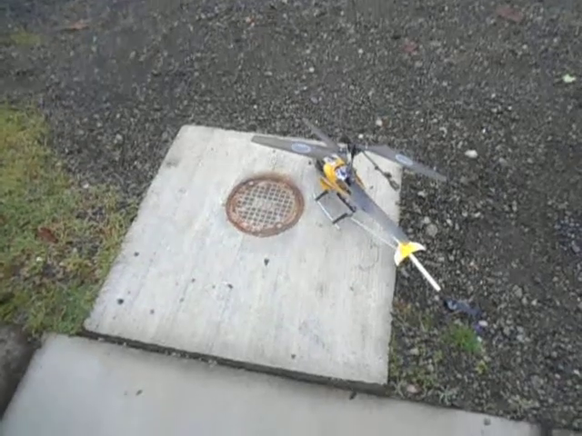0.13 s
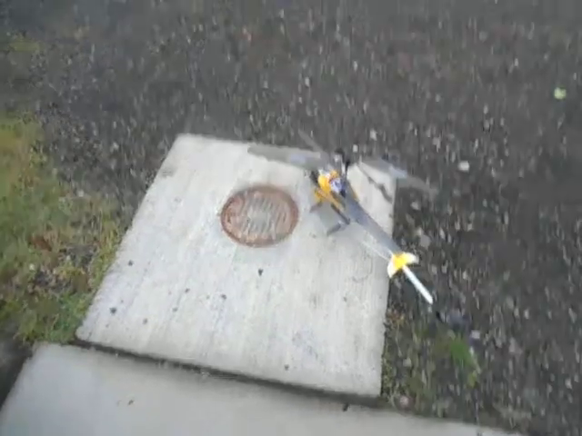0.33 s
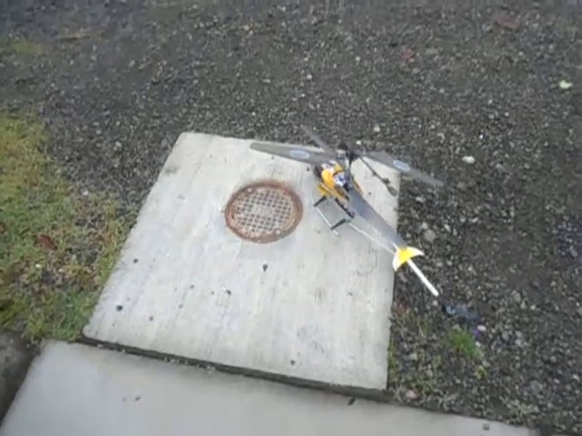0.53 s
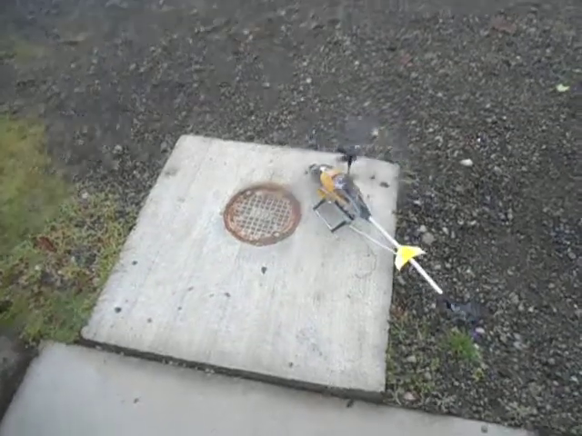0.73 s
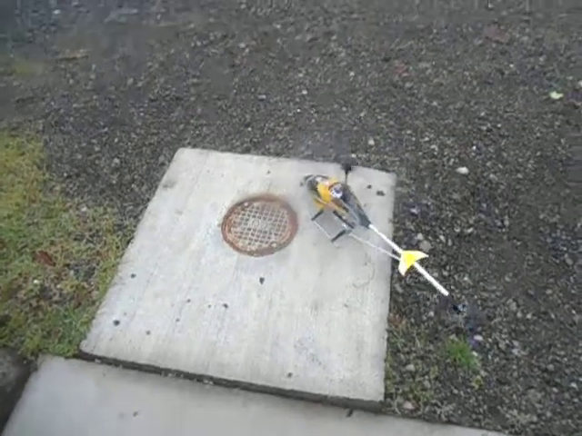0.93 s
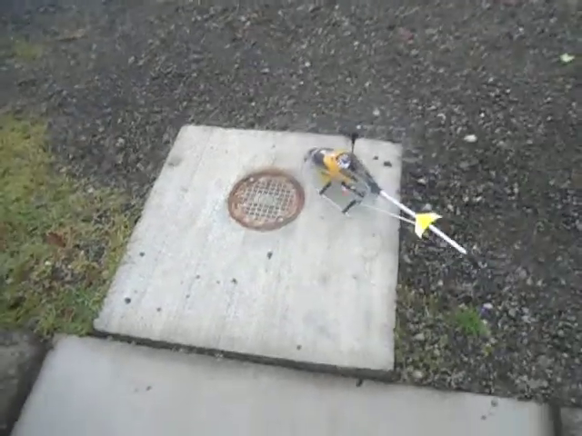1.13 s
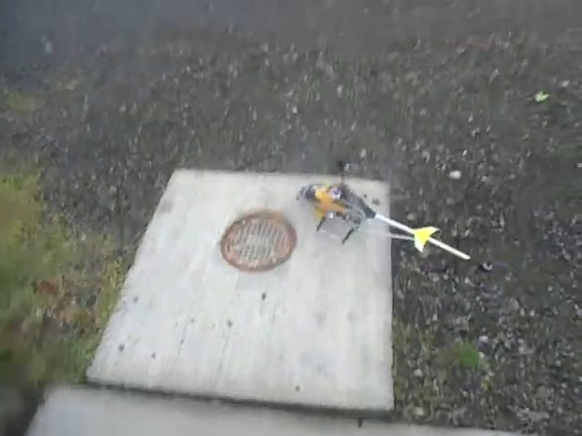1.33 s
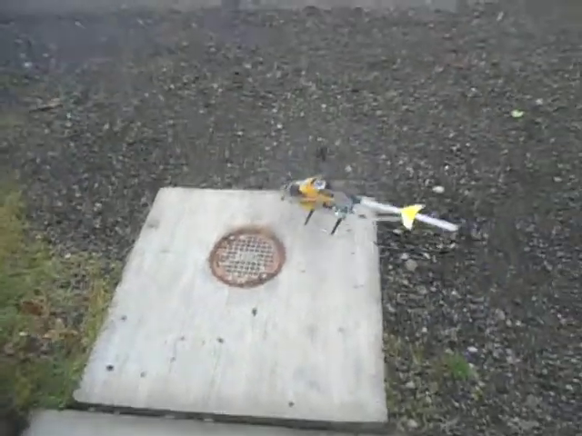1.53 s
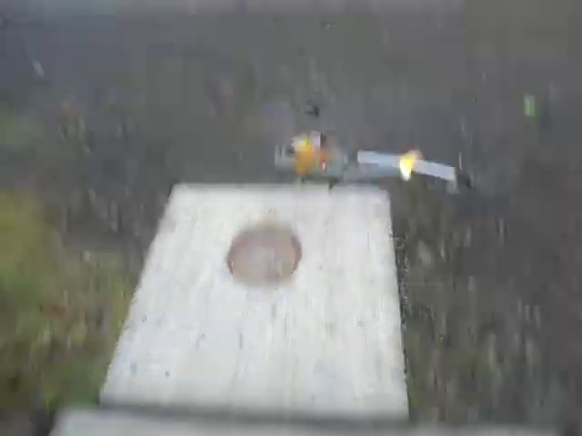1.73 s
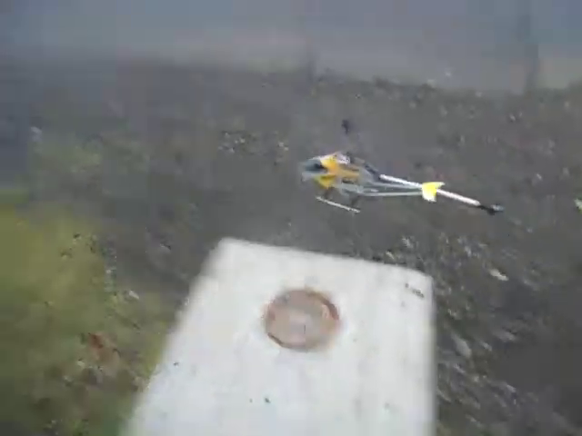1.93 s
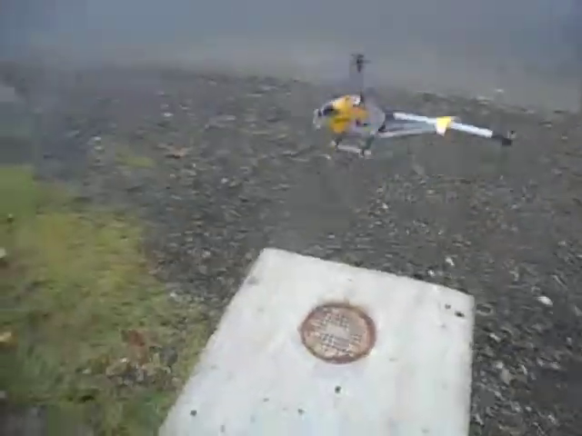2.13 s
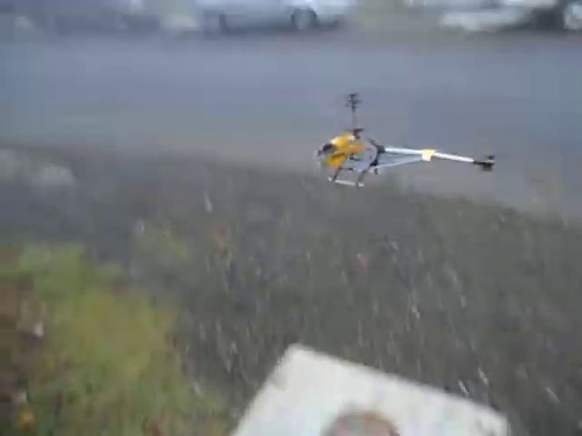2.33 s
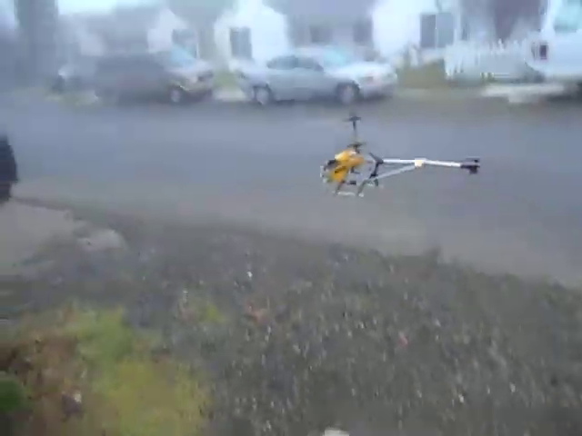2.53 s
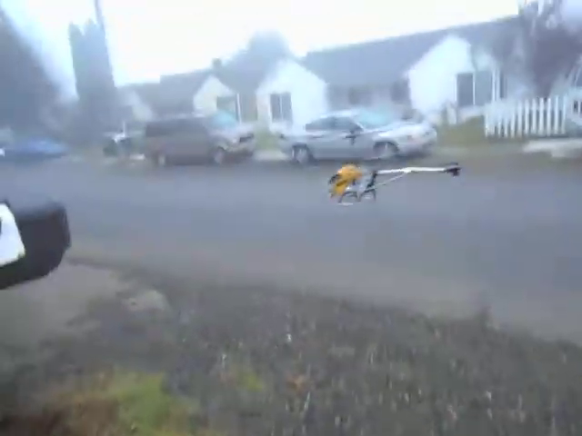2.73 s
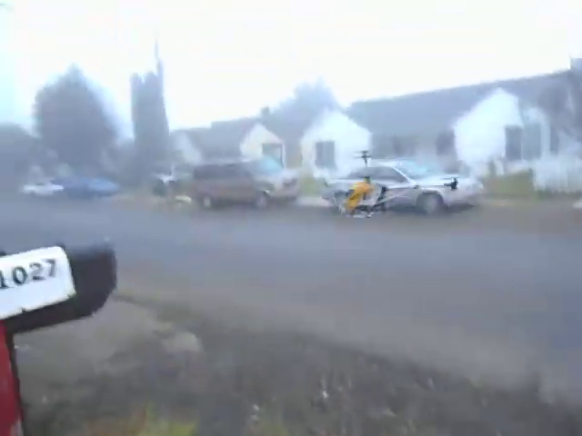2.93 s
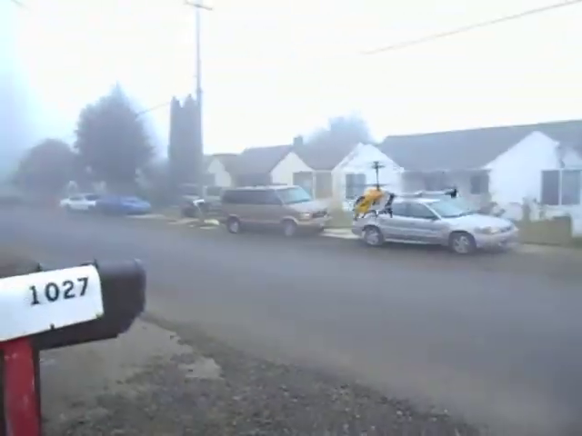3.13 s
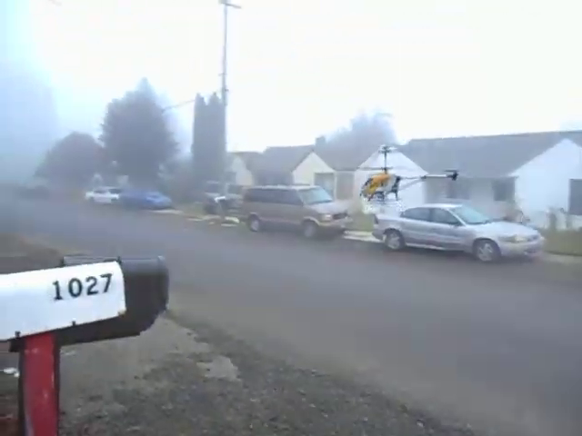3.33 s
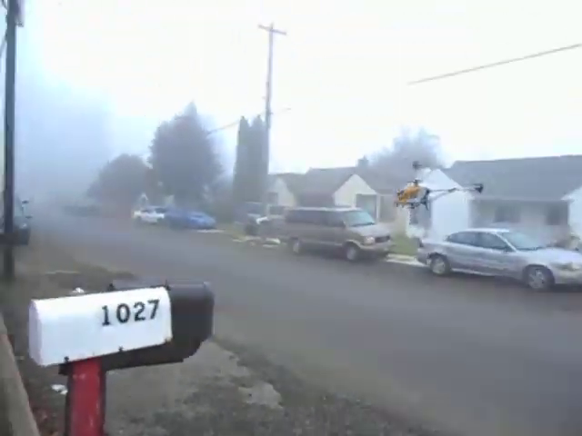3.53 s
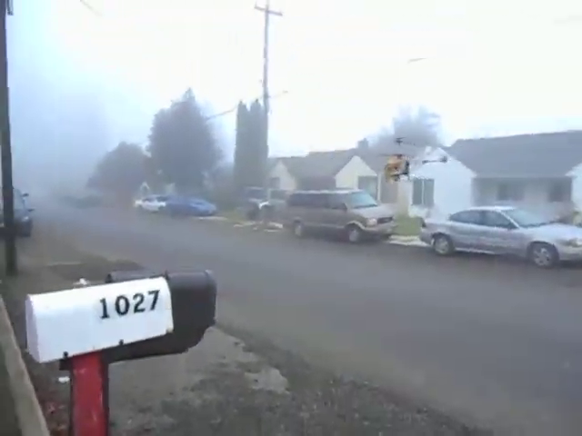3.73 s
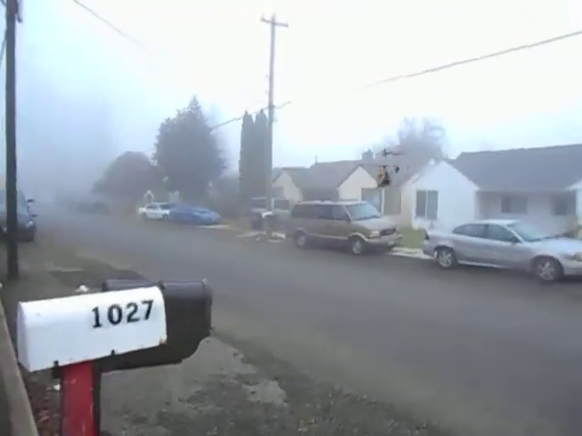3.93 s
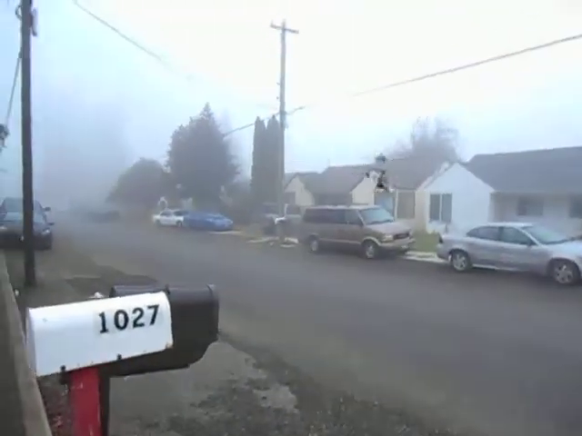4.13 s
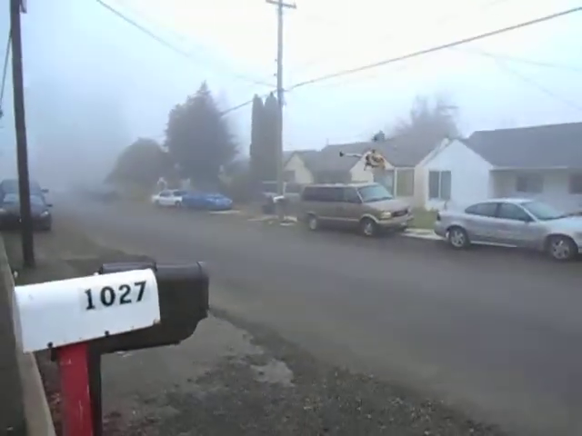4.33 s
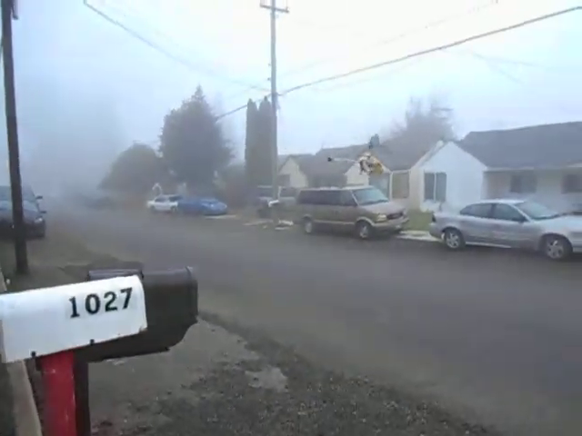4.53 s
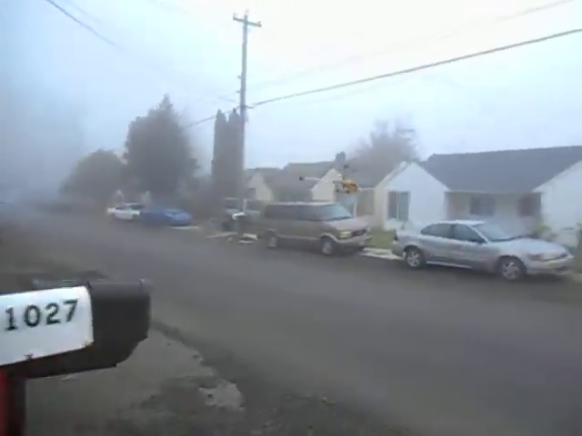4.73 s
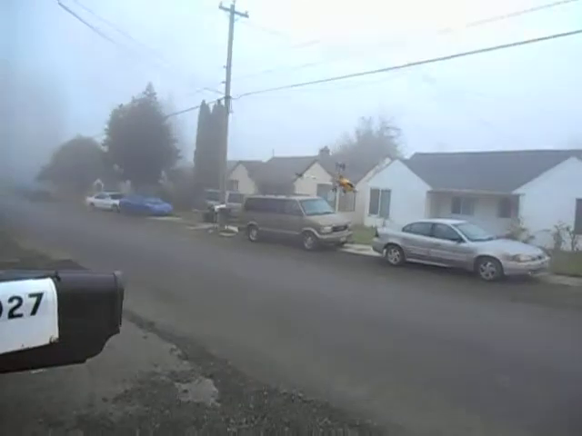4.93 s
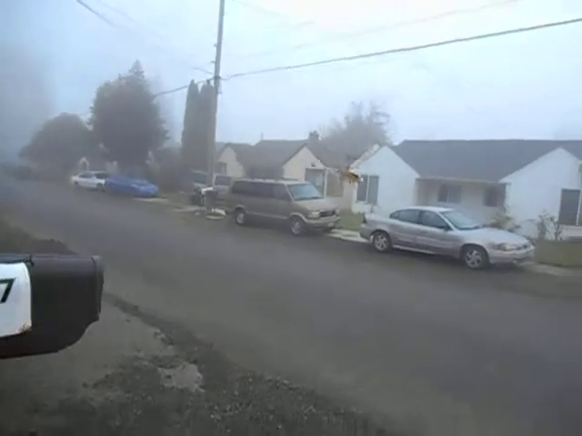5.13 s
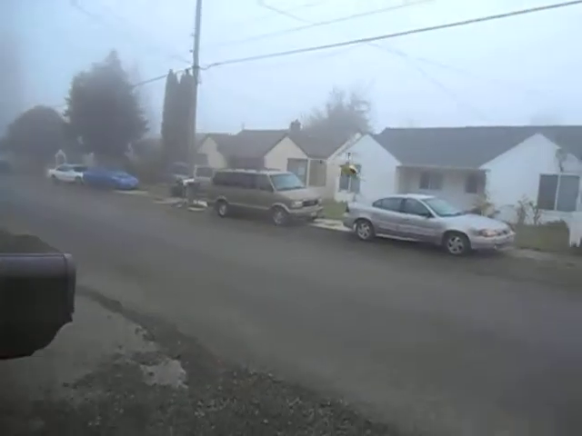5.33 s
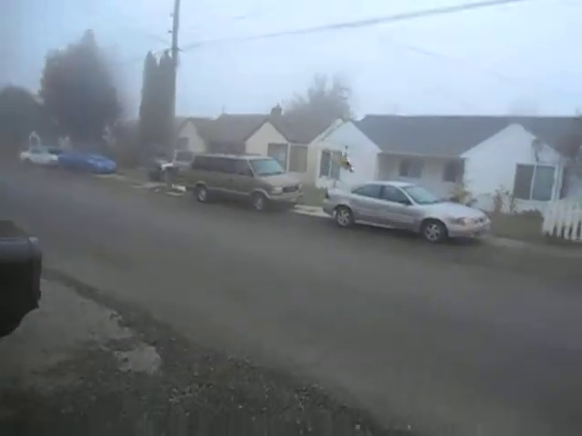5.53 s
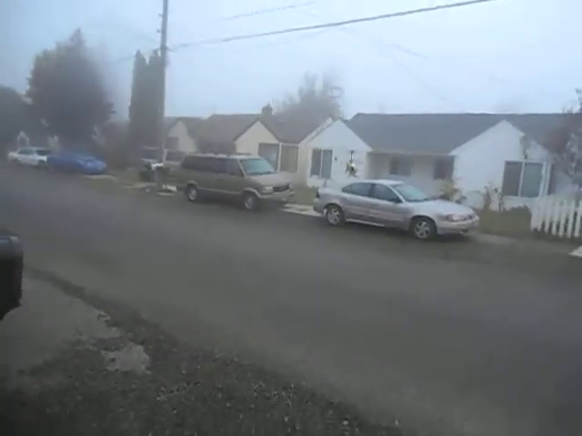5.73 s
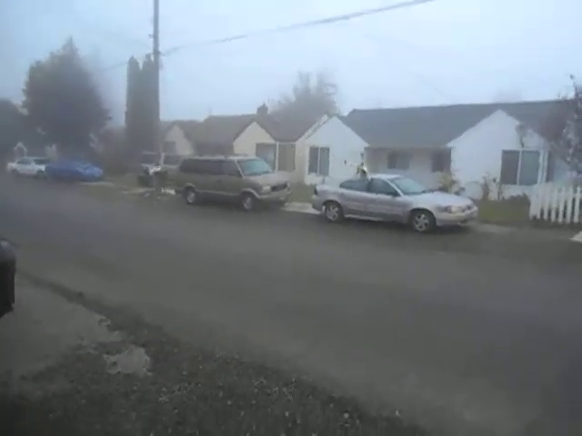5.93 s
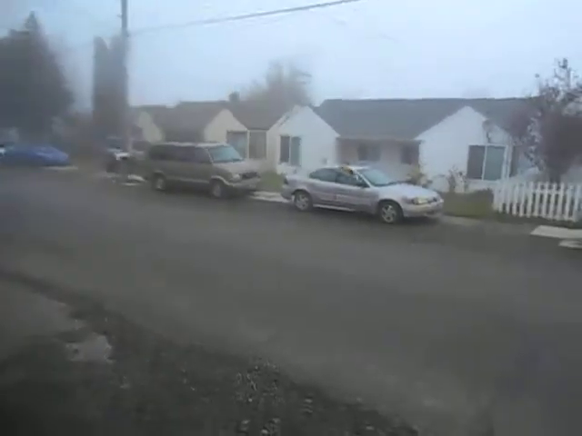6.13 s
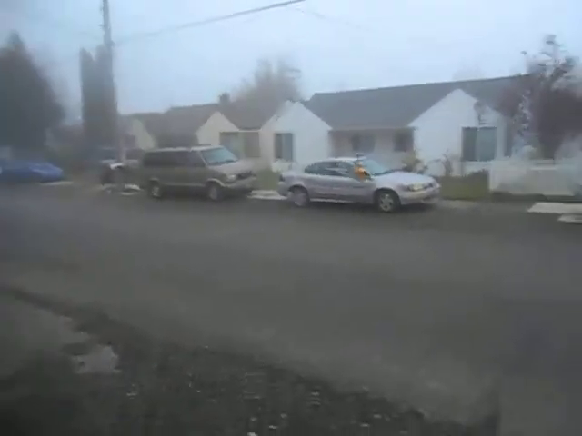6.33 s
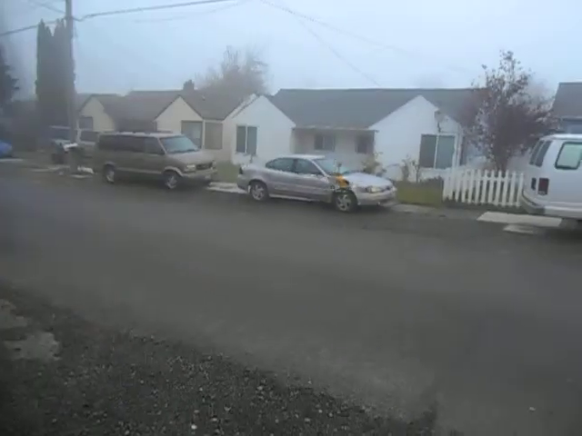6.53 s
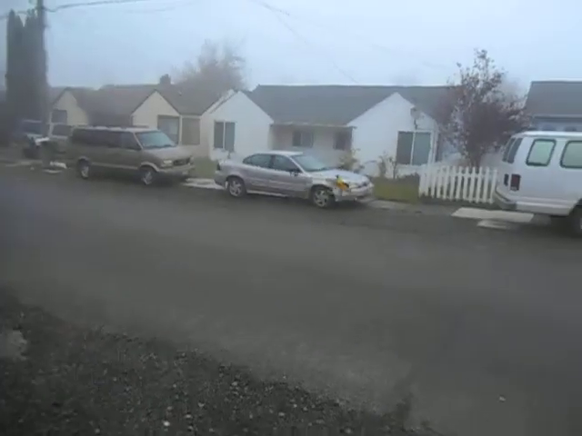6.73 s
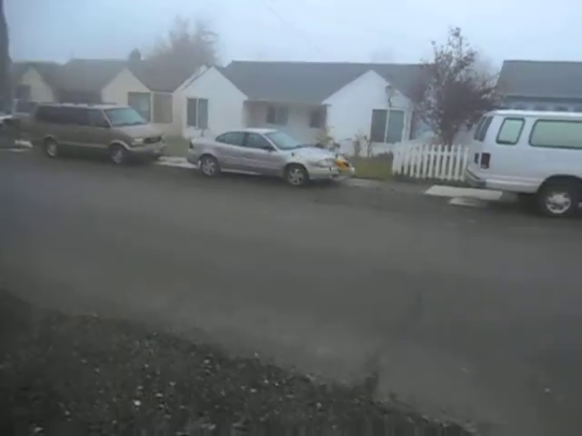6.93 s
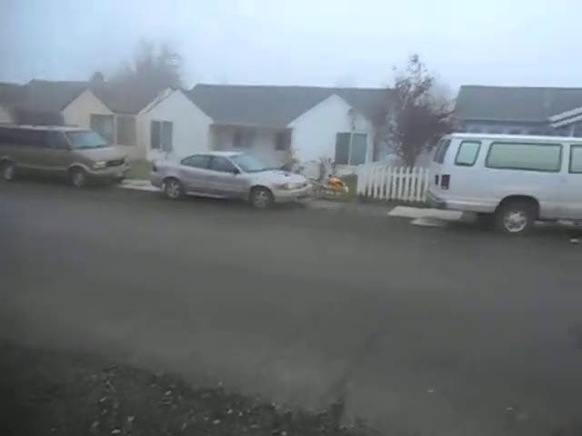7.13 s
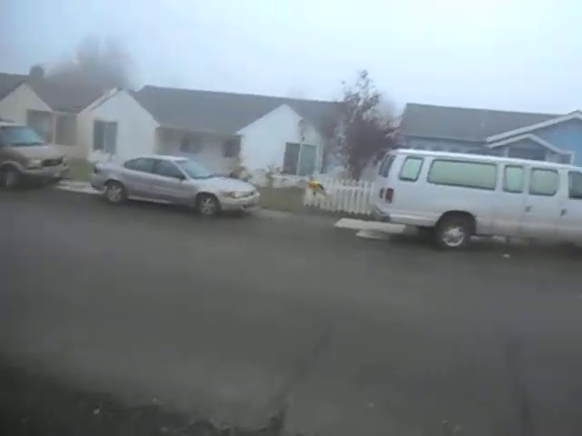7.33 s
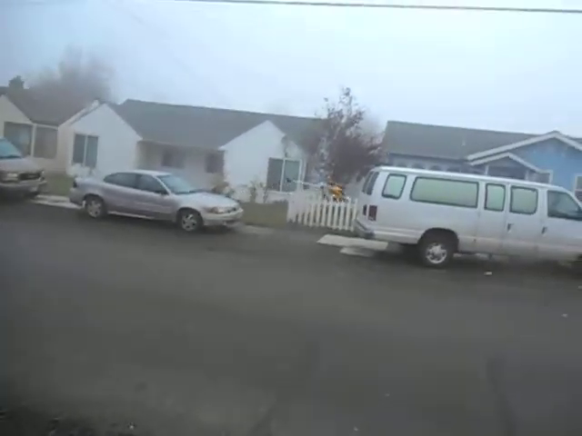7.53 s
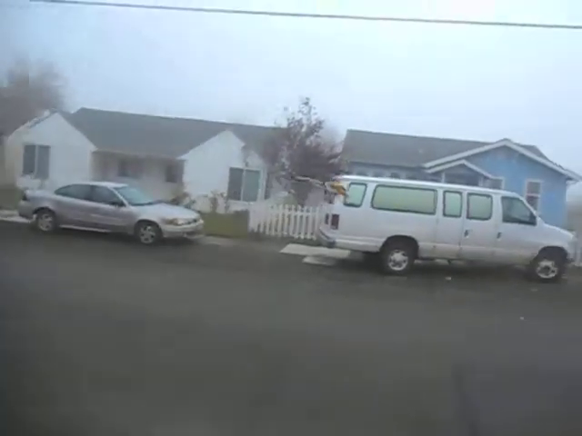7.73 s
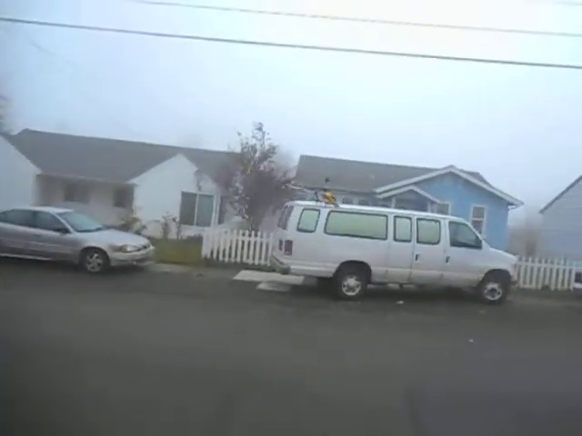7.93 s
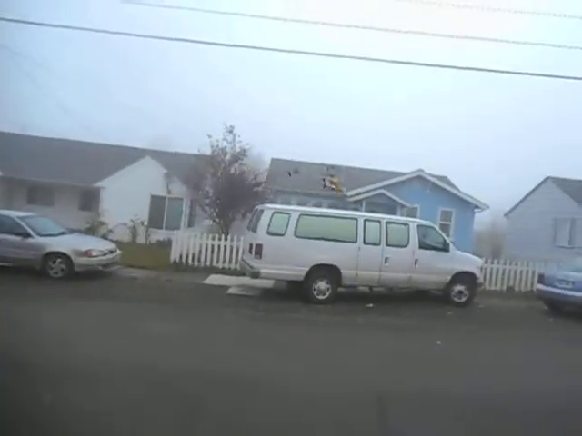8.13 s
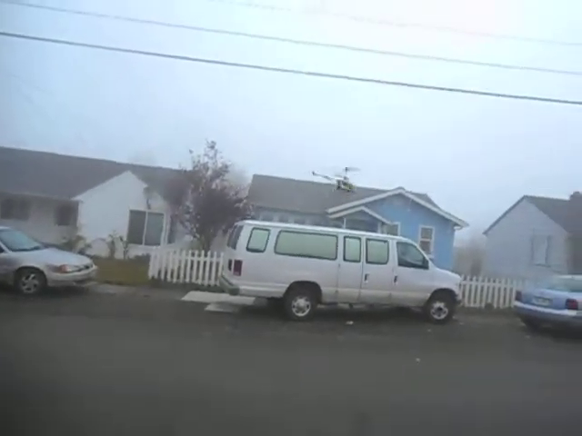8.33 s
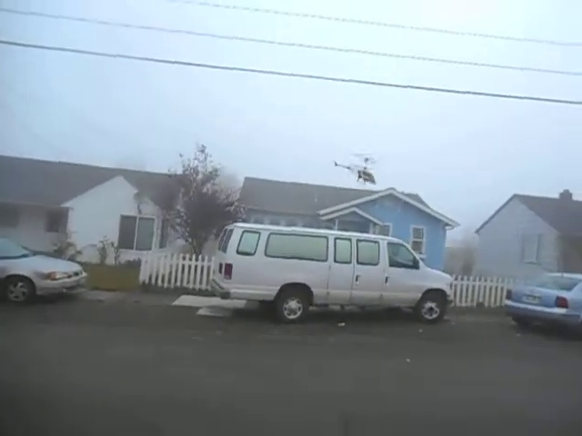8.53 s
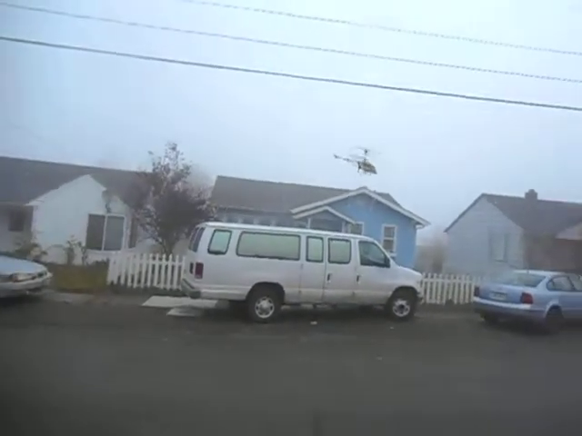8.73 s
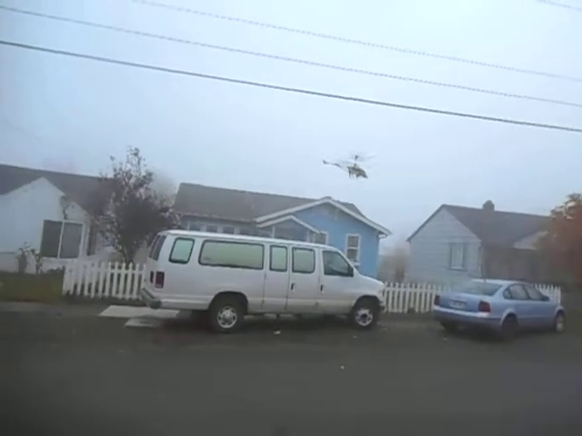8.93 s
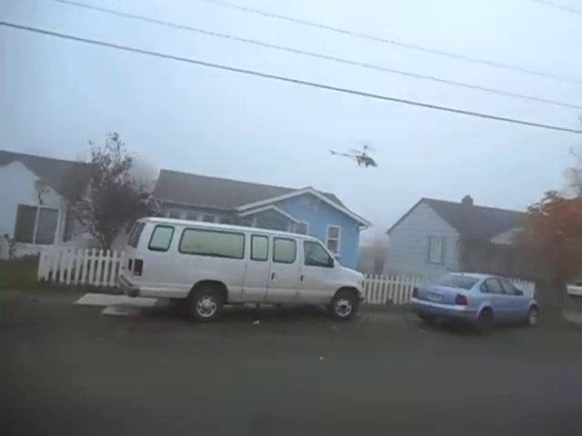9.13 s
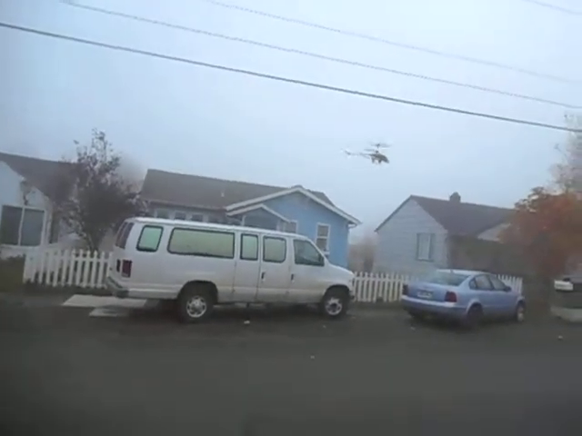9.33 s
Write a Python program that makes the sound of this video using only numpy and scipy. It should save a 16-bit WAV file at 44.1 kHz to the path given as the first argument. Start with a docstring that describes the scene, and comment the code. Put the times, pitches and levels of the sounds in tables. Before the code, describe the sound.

A small electric toy helicopter clicks, spools up and flies outdoors with a high, rattling gear whine and one sharp snap.

```python
"""Small plastic ticks, then a clack as gears take up: a toy helicopter spools up on a concrete slab
and flies off over a quiet street. Two motors drive its counter-turning rotors, each whining through
its own plastic gears, which wobble under blade load and rattle. The blades flutter softly.
A few dull handling knocks and one sharp snap sound close by; loud peaks duck the gain."""
import sys
import numpy as np
from scipy import signal
from scipy.fft import rfft, irfft, next_fast_len
from scipy.io import wavfile
from scipy.ndimage import uniform_filter1d

SR = 44100
rng = np.random.default_rng(int(sys.argv[2]) if len(sys.argv) > 2 else 0)


def dump(signal):
    """Clip the signal to [-1, 1] and save it as 16-bit WAV at the path in sys.argv[1]."""
    limited = np.clip(np.atleast_2d(signal).T, -1, 1)
    pcm = np.round(limited * 32767).astype(np.int16)
    wavfile.write(sys.argv[1], SR, pcm)


N = 414099
TIME_S = np.arange(N) / SR

# Noise spectra (frequency [Hz], relative density [dB])
AIR_SPECTRUM = [(15, -35), (25, 1), (76, -4), (118, -2.5), (197, -9.5), (291, -4.5), (6290, -13.5),
                (10000, -21), (12000, -48), (15600, -78), (22000, -120)]
KNOCK_SPECTRUM = [(60, 0), (300, -7), (620, 5), (900, -8), (1400, -2), (2500, -25), (6000, -36)]
TICK_SPECTRUM = [(30, -52), (120, -1), (350, -10), (700, 1.5), (1500, -0.5), (3000, 3.5), (4500, 2),
                 (6500, 0), (9500, -3), (11200, -25)]
RATTLE_SPECTRUM = [(150, -27), (700, -18), (1300, -12), (1700, 1.5), (2200, 5), (3000, -4.5), (4200, -5.5),
                   (5200, -1.5), (6200, -1), (8100, 7), (8900, 1), (10300, -6.5), (11000, -20.5),
                   (12200, -28)]
# Handling knocks (time [s], level [dB], high-pass corner [Hz])
KNOCK_HITS = [(.404, -23, 550), (0.419, -16, 550), (0.436, -18.5, 550), (0.451, -23, 550),
              (3.547, -21, 79.9), (3.586, -23, 301.3), (3.93, -22.5, 451), (5.569, -13, 156.8),
              (6.283, -16.5, 552), (6.298, -15, 550), (6.314, -20, 551), (7.805, -19.5, 553.4),
              (8.49, -21.5, 388.4), (8.936, -32, 306), (8.957, -25, 401)]
# Ticks, gear clacks and the snap (time [s], level [dB], treble gain [dB], t60 [s])
TICK_HITS = [(0.034, -22.5, 23, 0.013), (.112, -37, -2, 0.012), (0.143, -29.5, -13, 0.022),
             (0.216, -37, -13, 0.018), (0.257, -33, -9, 0.034), (.281, -31, -16, 0.026),
             (0.296, -30, -24, 0.048), (0.331, -30.5, -23, 0.078), (.381, -33, -19, 0.046),
             (0.454, -23, -24, 0.018), (0.595, -15.5, 3, 0.021), (0.615, -25, -7, 0.032),
             (0.629, -12, 2, 0.019), (0.643, -26, -3, 0.018), (0.6549, -4.5, 28, 0.029),
             (3.548, -9, -9, 0.031), (3.845, -11, 24, 0.015), (5.5684, 2.5, 11, 0.026),
             (5.572, -9.5, -2, 0.072), (6.263, -14, 8, 0.042)]
# Upper drive at held throttle (time [s], tooth rate [Hz])
THROTTLE_CURVE = [(.8, 1323), (.87, 1638), (.95, 1785), (1.13, 2082), (1.27, 2348), (1.5, 2356),
                  (1.65, 2467), (2.12, 2446), (2.6, 2294), (3.63, 2204), (3.85, 2350), (4.03, 2302),
                  (4.33, 2401), (5.25, 2422), (5.7, 2355), (6.3, 2317), (6.65, 2453), (7.95, 2461),
                  (8.4, 2260), (9.0, 2267), (9.39, 2346)]
# Quick stick moves (start [s], duration [s], tooth rate change [Hz])
STICK_STEPS = [(3.636, .12, 179), (5.636, 0.65, -185), (6.175, .16, -150), (8.689, .15, 223.5),
               (9.05, 0.16, 135)]
# Lower drive, which changes speed to steer (time [s], tooth rate [Hz], level [dB])
LOWER_DRIVE_CURVE = [(.8, 1181, -58), (1.03, 1630, -21.5), (1.3, 2116, -33.5), (1.6, 2426, -36.5),
                     (2.0, 2514, -35.5), (2.8, 2400, -31.5), (3.55, 2348, -48), (3.9, 2200, -30),
                     (4.4, 2395, -38), (5.2, 2439, -30), (6.0, 2490, -40), (6.32, 2668, -36.5),
                     (6.45, 2434, -45), (6.9, 2470, -44), (7.15, 2627, -27.5), (7.9, 2626, -29),
                     (8.55, 2424, -31), (9.39, 2314, -29.5)]
# Whine, rattle and rattle treble as the helicopter turns and drifts off (time [s], level [dB])
WHINE_CURVE = [(0.8, -29.5), (0.95, -20.5), (1.4, -22), (1.7, -25.5), (2.25, -23.5), (2.75, -25),
               (3.55, -22.5), (4.15, -26.5), (4.45, -24), (5.25, -28), (5.6, -32.5), (6.25, -29),
               (6.6, -26.2), (7.1, -25.5), (7.95, -22.5), (8.25, -26.5), (8.8, -25), (9.39, -28.5)]
RATTLE_CURVE = [(.63, -29), (.67, -30.5), (.75, -38), (.78, -28), (.93, -25), (1.38, -25.5), (1.65, -31),
                (2.25, -25.5), (2.7, -29), (3.6, -26), (4.1, -28), (5.2, -29.5), (5.6, -34), (6.15, -35.5),
                (6.3, -32.5), (6.8, -30), (7.95, -26.5), (8.35, -27), (8.8, -26), (9.39, -30.5)]
TREBLE_CURVE = [(1.05, 3.5), (1.6, 3), (2.8, 1), (3.5, 1), (4.1, -4), (5.2, -.5), (6.3, 2.5), (7.2, 4.5),
                (8.35, -4), (8.8, -2), (9.39, -2.5)]
# Plastic shell resonances (frequency [Hz], gain [dB])
SHELL_RESPONSE = [(1350.0, -43), (1750.0, -9.5), (2050.0, -7.5), (2350.0, -9.5), (2900.0, -7.5),
                  (3400.0, -4), (4200.0, -10.5), (4800.0, -2.5), (6100.0, -8.5), (6750.0, -5.5),
                  (7150.0, 1), (7900.0, -1), (8800.0, -6.5), (9200.0, -9), (9900.0, -12)]
# Squeals of the upper drive's 4th harmonic (centre [s], half width [s], boost [dB])
SQUEAL_SWELLS = [(1.066, .07, 5.5), (3.48, 0.29, 5), (6.247, .09, 2)]
# Harmonics 1, 2, ... of blade beat, pinions and lower slow stage (relative level [dB])
BLADE_HARMONICS_DB = [-11, -1.5, -7, -1, -6, -4]
UPPER_HARMONICS_DB = [1.46, 0.1, 0.5, 0.5, -1]
LOWER_HARMONICS_DB = [-1.5, -12.5, -11]
LOWER_SLOW_HARMONICS_DB = [-1, 9]

HOVER_HZ, TEETH_PER_BLADE = 2403, 58.4
LIFT_OFF_S, CLIMB_M_PER_S = 1.59, 1.1
CONTROL_STEP = 16  # samples


def from_db(db):
    """Decibels to gain."""
    return np.exp(np.asarray(db) * (np.log(10) / 20))


def unit_rms(x):
    """Scale to unit power."""
    return x / np.sqrt(np.mean(x ** 2) + 1e-20)


def curves(rows):
    """Each value column of a time table, per sample."""
    times_s, *columns = np.transpose(rows)
    return [np.interp(TIME_S, times_s, column) for column in columns]


def spectrum_db(spectrum, hz):
    """Level of a spectrum table, interpolated in log frequency."""
    points_hz, db = np.transpose(spectrum)
    return np.interp(np.log(hz), np.log(points_hz), db)


def ramp(start_s, length_s):
    """Linear rise from 0 to 1."""
    return np.clip((TIME_S - start_s) / length_s, 0, 1)


def lag(x, tau_s):
    """First-order lag."""
    pole = np.exp(-1 / (tau_s * SR))
    return signal.lfilter([1 - pole], [1, -pole], x + 1e-18)


def butter(x, kind, corner_hz, order=2):
    """Butterworth filter."""
    return signal.sosfilt(signal.butter(order, corner_hz, kind, fs=SR, output="sos"), x + 1e-18)


def flicker(corner_hz):
    """Smooth random drift, unit RMS."""
    white = rng.standard_normal(next_fast_len(N // CONTROL_STEP + 2))
    hz = np.fft.rfftfreq(len(white), CONTROL_STEP / SR)
    drift = unit_rms(irfft(rfft(white) / (1 + (hz / corner_hz) ** 2)))
    return np.interp(np.arange(N) / CONTROL_STEP, np.arange(len(drift)), drift)


def noise(spectrum):
    """Shaped noise, unit RMS."""
    size = next_fast_len(N)
    hz = np.maximum(np.fft.rfftfreq(size, 1 / SR), 1)
    gain = from_db(spectrum_db(spectrum, hz))
    return unit_rms(irfft(rfft(rng.standard_normal(size)) * gain)[:N])


def phase_rad(hz):
    """Running phase from a random start."""
    return 2 * np.pi * (np.cumsum(hz) / SR + rng.random())


def burst(source, start_s, level_db, t60_s):
    """A blow rings a dense cluster of fast-dying modes."""
    age_s = np.arange(SR // 5) / SR
    start = int(start_s * SR)
    span = slice(start, start + len(age_s))
    out = np.zeros(N)
    out[span] = source[span] * from_db(level_db - 60 * age_s / t60_s) / 2
    return out


def street(air_db=-57, hum_db=-64, hum_hz=178):
    """Still air and a far hum."""
    air = noise(AIR_SPECTRUM)
    hum = unit_rms(np.sin(phase_rad(hum_hz * (1 + 0.0049 * flicker(2.1)))))
    return from_db(air_db) * air + from_db(hum_db) * hum


def knocks(t60_s=0.032):
    """Dull, close bumps of handling."""
    body = noise(KNOCK_SPECTRUM)
    hits = sum(butter(burst(body, s, db, t60_s), "high", hz) for s, db, hz in KNOCK_HITS)
    return butter(hits, "low", 5400)


def ticks():
    """Plastic ticks, clacks and a snap, each with its own brightness and decay."""
    body = noise(TICK_SPECTRUM)
    dull = butter(body, "low", 2700, order=1)
    hits = 0
    for start_s, level_db, treble_db, t60_s in TICK_HITS:
        ring = unit_rms(dull + from_db(treble_db) * (body - dull))
        hits += burst(ring, start_s, level_db, t60_s)
    return butter(hits, "low", 11200, order=8)


def upper_tooth_hz(motor_lag_s=0.027):
    """Held throttle plus the motor's lagging response to the stick."""
    stick_hz = sum(hz * ((TIME_S > s) & (TIME_S < s + held_s)) for s, held_s, hz in STICK_STEPS)
    return curves(THROTTLE_CURVE)[0] + lag(stick_hz, motor_lag_s)


def near_ground(reach_m=0.9):
    """Ground effect: 1 on the slab, 1/2 at height reach_m."""
    height_m = CLIMB_M_PER_S * np.maximum(TIME_S - LIFT_OFF_S, 0)
    return 1 / (1 + (height_m / reach_m) ** 2)


def rotors(upper_hz, beat_db_per_octave=32):
    """Blades push air in soft beats and a wash, both louder near the ground."""
    wash_db = -52.5 + 9.5 * near_ground()
    beat_db = -64.5 + 12 * near_ground(reach_m=1.3) + beat_db_per_octave * np.log2(upper_hz / HOVER_HZ)
    blade_rad = phase_rad(upper_hz / TEETH_PER_BLADE)
    beats = sum(from_db(db + 2 * flicker(1.8)) * np.sin(k * blade_rad)
                for k, db in enumerate(BLADE_HARMONICS_DB, 1))
    wash = noise([(20, -7), (120, -11), (250, -4.5), (600, -0.5), (1200, 2), (4000, -38)])
    return from_db(beat_db) * beats * ramp(0.73, 1) + from_db(wash_db) * wash * ramp(0.64, 0.7)


def rattle(upper_hz, engage_s=0.5847, rasp_db_per_octave=5):
    """Loose teeth and brushes: grainy hiss pulsing with the blades, raspier at low speed."""
    hiss = noise(RATTLE_SPECTRUM)
    low = butter(hiss, "low", 1790, order=3)
    mid = butter(butter(hiss, "high", 2690, order=3), "low", 5470, order=3)
    high = butter(hiss, "high", 7530, order=3)
    level_db, = curves(RATTLE_CURVE)
    treble_db, = curves(TREBLE_CURVE)
    rasp_db = rasp_db_per_octave * np.log2(HOVER_HZ / upper_hz)
    low_db = -28.5 + rasp_db + 0.75 * (level_db - level_db.mean()) + 6 * near_ground()
    mid_db, high_db = level_db + 5, level_db + treble_db + 4.5
    running = low * from_db(low_db) - mid * from_db(mid_db) + high * from_db(high_db)
    # Slack gears stir before they take up.
    rustle = (2 * (low - mid) + high) * from_db(-55.5) * ramp(0, 0.29) * (1 - ramp(0.46, 0.02))
    blade_rad = phase_rad(upper_hz / TEETH_PER_BLADE)
    pulse_db = 0.6 * (np.sin(blade_rad) + np.sin(2 * blade_rad))
    grain = unit_rms(from_db(flicker(280) + pulse_db))
    return (running * ramp(engage_s, 0.019) + rustle) * grain


def blade_pattern(blade_rad):
    """Uneven per-blade pattern, shifting as the body turns; unit RMS."""
    blade_rad, turn = blade_rad[::CONTROL_STEP], flicker(1.5)[::CONTROL_STEP]
    pattern = sum(np.sin(k * blade_rad + rng.uniform(0, 2 * np.pi) + turn * rng.standard_normal()) / k
                  for k in range(1, 5))
    return np.interp(np.arange(N) / CONTROL_STEP, np.arange(len(pattern)), unit_rms(pattern))


def gear_wobble(upper_hz):
    """Wobble scale: gears run unevenly at high speed and on rising throttle."""
    throttle_hz, = curves(THROTTLE_CURVE)
    rise_hz_per_s = uniform_filter1d(np.gradient(throttle_hz) * SR, size=SR // 5)
    effort = 0.98 + 3.1 * np.log2(upper_hz / HOVER_HZ) + 0.000608 * rise_hz_per_s
    return np.clip(effort, 0.502, 1.09)


def gear(motor_hz, harmonics_db, wobble, sway, jitter, throb_db, smear, rough_db, ratio=1):
    """Meshing teeth: blade load sways their rate, passing blades chop the tone, backlash roughens it."""
    tooth_hz = motor_hz * ratio
    blade_rad = phase_rad(motor_hz / TEETH_PER_BLADE * (1 + 0.006 * flicker(4)))
    swing = sway * (np.sin(blade_rad) + 0.3 * np.sin(blade_rad / 2)) + jitter * flicker(130)
    mesh_rad = phase_rad(tooth_hz * (1 + wobble * swing))
    out = 0
    for k, db in enumerate(harmonics_db, 1):
        chop = from_db(throb_db * blade_pattern(blade_rad) + rough_db * flicker(70 * k))
        tone = unit_rms(chop * np.sin(k * mesh_rad + smear * wobble * blade_pattern(blade_rad)))
        rolloff_db = np.interp(k * tooth_hz, [10200, 11000], [0, -28])
        out += from_db(db + rolloff_db) * tone
    return out


def upper_levels_db(upper_hz, whine_db):
    """Harmonics slide through shell resonances; coasting unloads the teeth, fading the lowest most."""
    coast_hz = np.minimum(upper_hz - curves(THROTTLE_CURVE)[0], 0)
    slack_db = -6.5 * (coast_hz / 337.2) ** 2
    levels_db = [whine_db + db + spectrum_db(SHELL_RESPONSE, k * upper_hz) + slack_db / k
                 for k, db in enumerate(UPPER_HARMONICS_DB, 1)]
    levels_db[3] += sum(db * np.exp(-((TIME_S - s) / half_s) ** 2) for s, half_s, db in SQUEAL_SWELLS)
    return levels_db


def gear_whine(upper_hz, slow_db_per_octave=29):
    """Two motor pinions; each turns a slower stage that sings once the rotors carry the weight."""
    lower_hz, lower_db = curves(LOWER_DRIVE_CURVE)
    whine_db, = curves(WHINE_CURVE)
    wobble = gear_wobble(upper_hz)
    upper = gear(upper_hz, upper_levels_db(upper_hz, whine_db), wobble,
                 sway=0.014, jitter=0.007, throb_db=2.4, smear=0.45, rough_db=2.9)
    lower = gear(lower_hz, [lower_db + db for db in LOWER_HARMONICS_DB], wobble,
                 sway=0.011, jitter=0.006, throb_db=3.5, smear=0.5, rough_db=2.5)
    upper_slow_db = whine_db - 18 + slow_db_per_octave * np.log2(upper_hz / HOVER_HZ)
    upper_slow = gear(upper_hz, [upper_slow_db], wobble,
                      sway=0.015, jitter=0.017, throb_db=3.3, smear=0.45, rough_db=3.2, ratio=0.379)
    lower_slow = gear(lower_hz, [whine_db - 27.5 + db for db in LOWER_SLOW_HARMONICS_DB], wobble,
                      sway=0.012, jitter=0.009, throb_db=3, smear=0.4, rough_db=2.5, ratio=0.3535)
    return (upper + lower) * ramp(0.75, 0.051) + (upper_slow + lower_slow) * ramp(LIFT_OFF_S, 0.15)


def scene():
    """Helicopter, close contacts and street; mono."""
    upper_hz = upper_tooth_hz()
    helicopter = gear_whine(upper_hz) + rattle(upper_hz) + rotors(upper_hz)
    return (helicopter + ticks() + knocks() + street())[None]


def gain_control(x, limit_db=-11.5, attack_s=0.028, release_db_per_s=16):
    """Loud peaks duck the gain; it creeps back."""
    power = uniform_filter1d(x ** 2, size=128)
    over_db = np.maximum(10 * np.log10(np.maximum(power, 1e-12)) - limit_db, 0)
    release_db = release_db_per_s * TIME_S
    held_db = np.maximum.accumulate(over_db + release_db, axis=-1) - release_db
    return x * from_db(-lag(held_db, attack_s))


def record(dry):
    """Soft clip, gain control, steep low-pass."""
    ceiling, cutoff_hz = 0.72, 12300
    clipped = dry / (1 + (dry / ceiling) ** 4) ** (1 / 4)
    lowpass = signal.ellip(10, 0.2, 80, cutoff_hz, fs=SR, output="sos")
    return signal.sosfilt(lowpass, gain_control(clipped))


dry = scene()
out = record(dry)
dump(out)
```